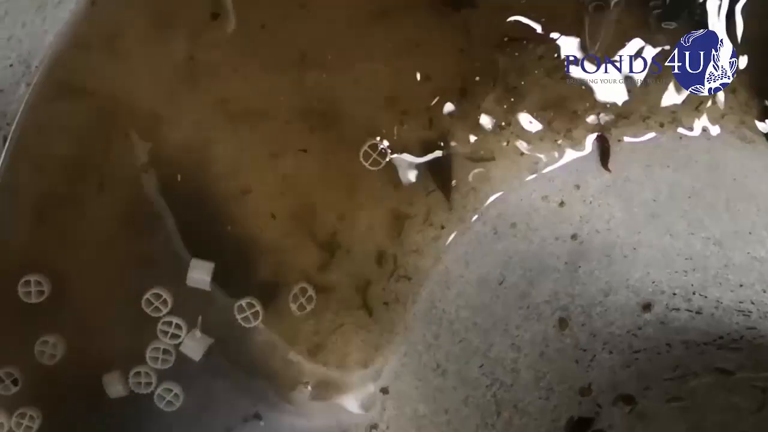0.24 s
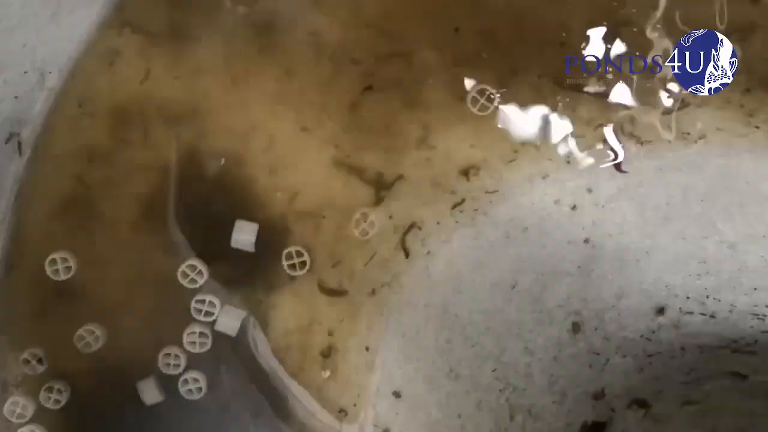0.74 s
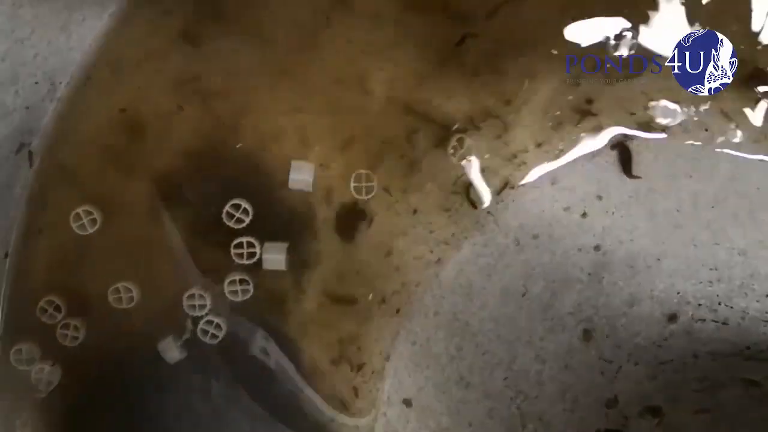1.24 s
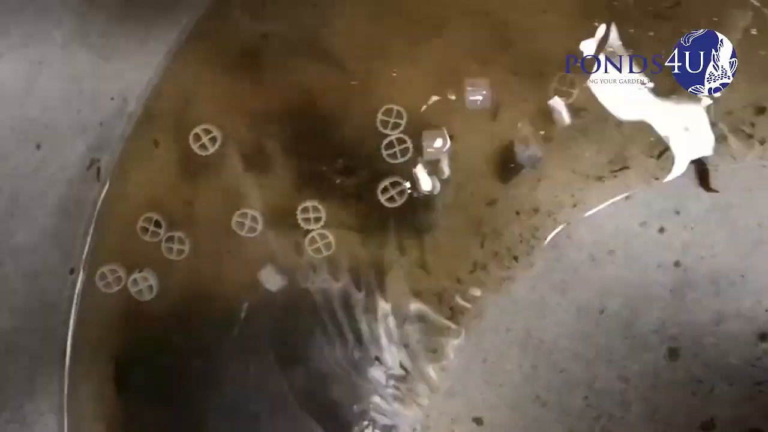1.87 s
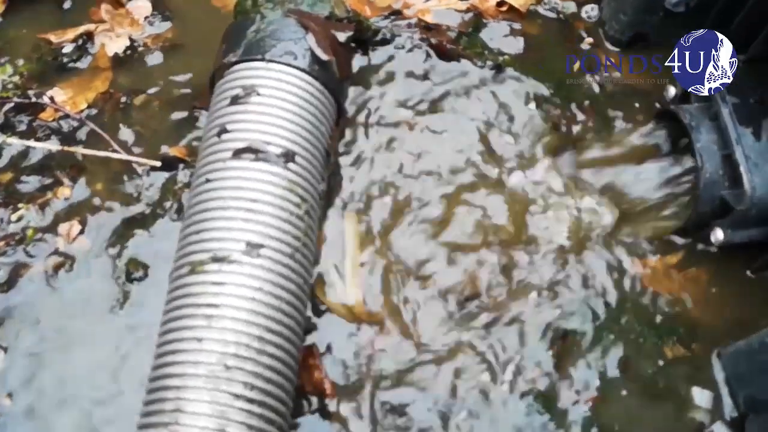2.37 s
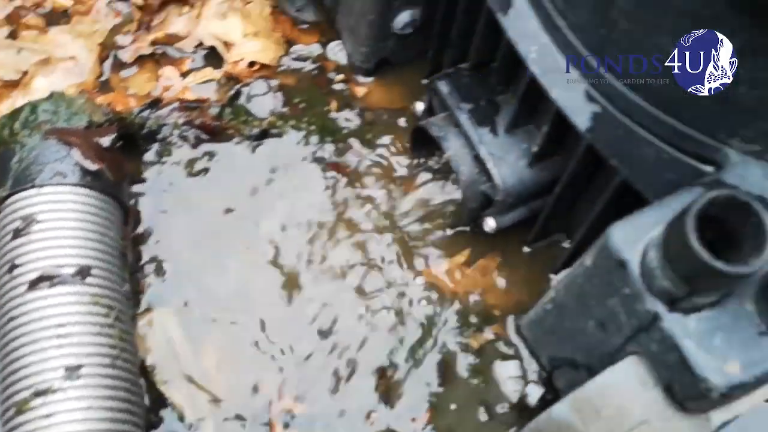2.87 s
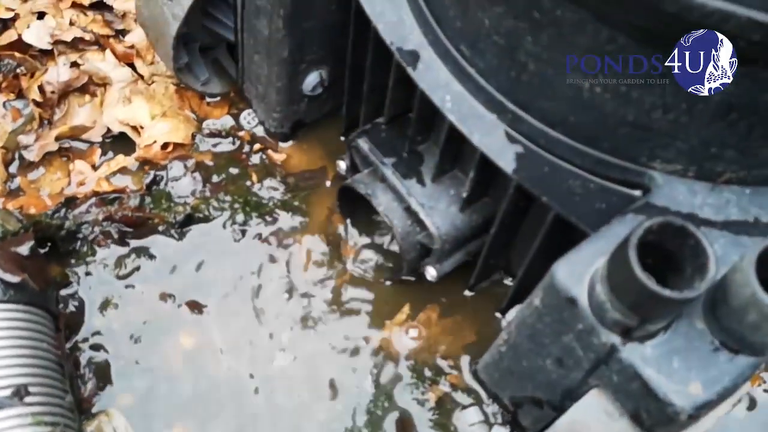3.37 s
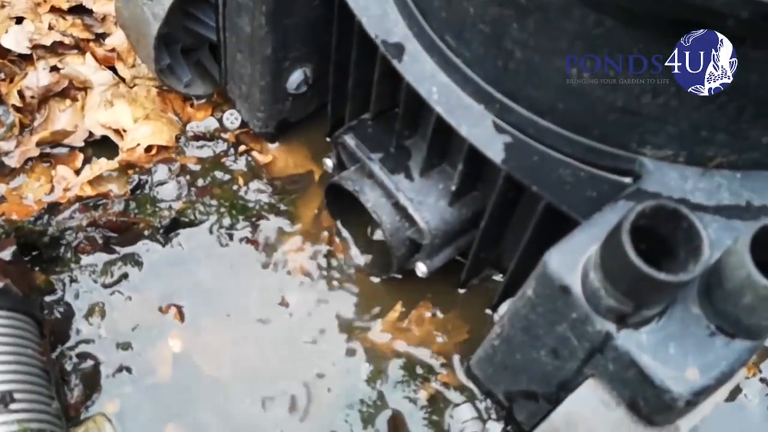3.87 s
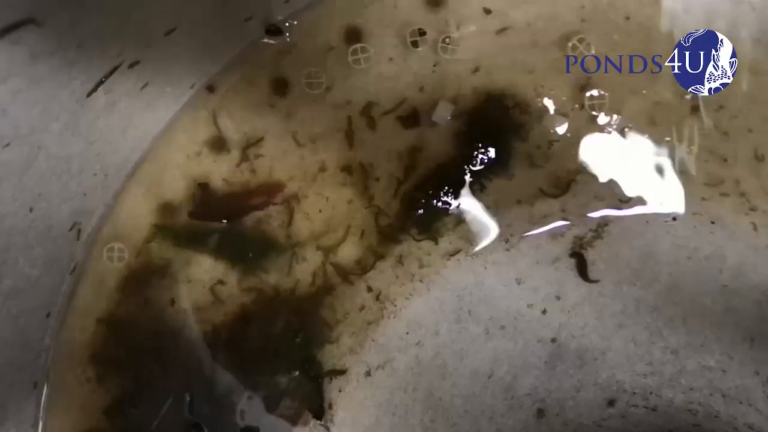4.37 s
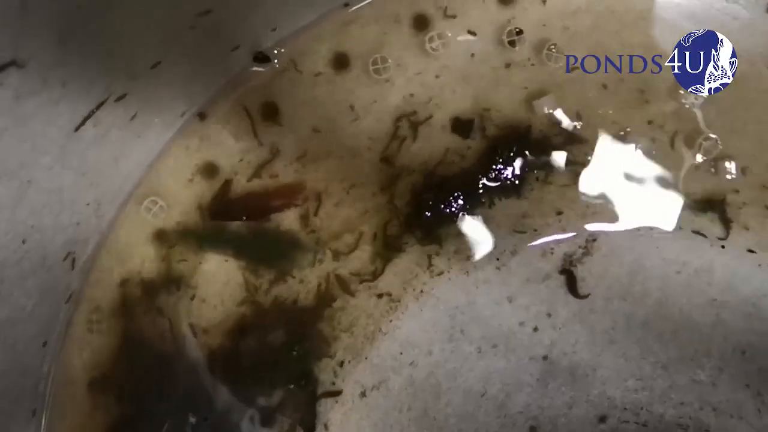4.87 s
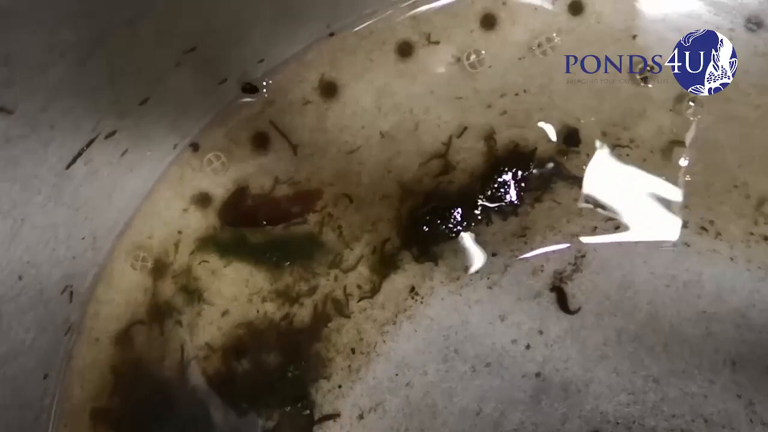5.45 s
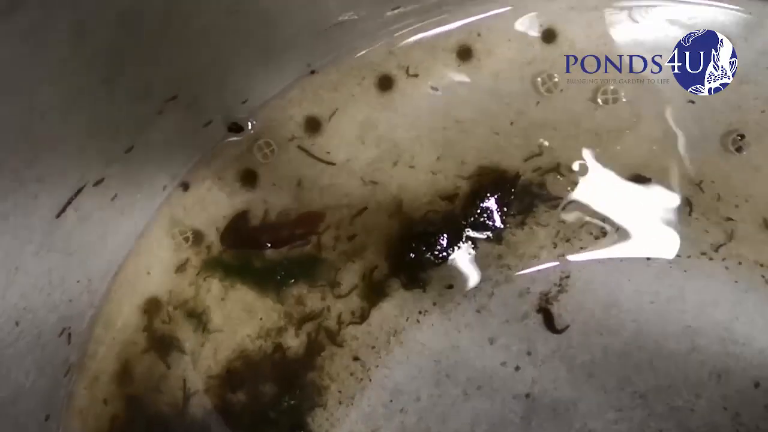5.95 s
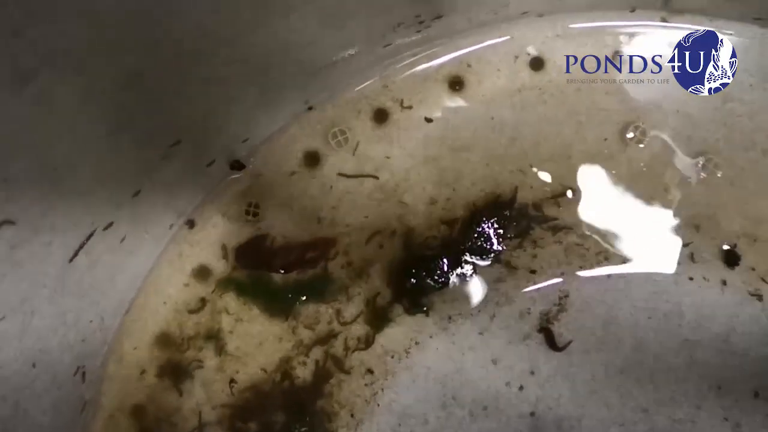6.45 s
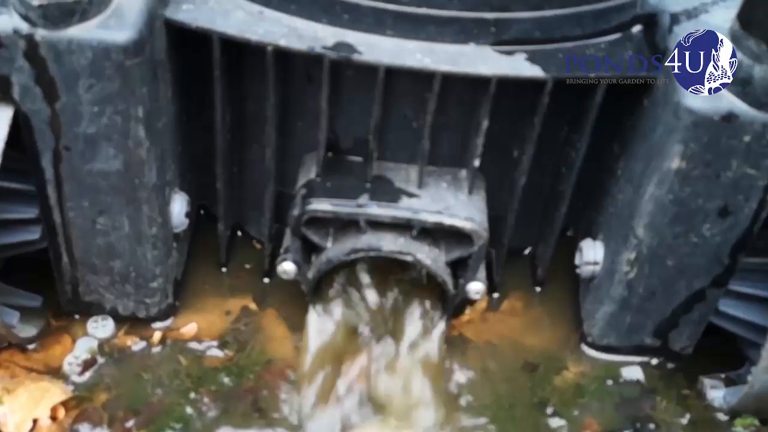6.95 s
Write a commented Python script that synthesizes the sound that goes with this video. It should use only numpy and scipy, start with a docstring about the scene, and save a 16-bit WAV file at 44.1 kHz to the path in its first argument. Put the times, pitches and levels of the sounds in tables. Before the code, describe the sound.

Water gulps, slaps and sprays inside a hollow plastic drum over a low pump hum, cutting abruptly between close, distant and gushing views.

```python
"""Water sloshes, slaps and sprays inside the plastic drum of a pond filter, heard in four hard-cut shots.
Hiss of droplets and ringing bubbles make the water; the air of the drum rings along in many modes.
The pump hums at twice the mains rate, over a drum boom and a rumble of flow.
The second shot is quieter and farther off, a short silence follows it, and the last faces the gushing outlet,
with a whine. Two microphone ports hear each shot with their own levels and phases."""
import sys
import numpy as np
from scipy import signal
from scipy.fft import rfft, irfft, next_fast_len
from scipy.io import wavfile
from scipy.ndimage import uniform_filter1d

SR = 44100
rng = np.random.default_rng(int(sys.argv[2]) if len(sys.argv) > 2 else 0)


def master_out(mix):
    """Clip the mix to full scale and print it as 16-bit PCM to the path in sys.argv[1]."""
    frames = np.transpose(np.atleast_2d(mix))
    ceiling = np.clip(frames, -1, 1)
    pcm = np.round(ceiling * 32767).astype(np.int16)
    wavfile.write(sys.argv[1], SR, pcm)


N = 317652
SLOW_STEP = 40   # samples between the points of a slow control curve


def amp(db):
    """Gain of a level in dB."""
    return 10 ** (np.asarray(db) / 20)


def rms_one(x):
    """Scaled to rms 1."""
    return x / np.sqrt(np.mean(x ** 2) + 1e-20)


# The four shots at the filter. Each row: start in seconds, end in seconds.
SHOT_TIMES = [(0, 1.505), (1.505, 3.771), (3.971, 6.903), (6.903, 7.21)]


def during(*shots):
    """1 while one of the numbered shots runs, 0 elsewhere."""
    t = np.arange(N) / SR
    return sum((t >= SHOT_TIMES[k][0]) & (t < SHOT_TIMES[k][1]) for k in shots)


def in_time(shots):
    """The columns of per-shot tables, sample by sample, jumping at the cuts."""
    t = np.arange(N) / SR
    out = np.zeros((len(shots[0][0]) - 1, N))
    for rows, (start, end) in zip(shots, SHOT_TIMES):
        s, *columns = np.transpose(rows)
        from_here = t >= start
        out[:, from_here] = [np.interp(t[from_here], s, column) for column in columns]
    return out


def at_hz(points, hz):
    """A table of frequency and value, read on a log-frequency axis."""
    table_hz, value = np.array(points).T
    return np.interp(np.log(hz), np.log(table_hz), value)


def every_sample(slow):
    """A slow control curve read at every sample."""
    return np.interp(np.arange(N) / SLOW_STEP, np.arange(len(slow)), slow)


def slow_time():
    """Times in seconds of the points of a slow control curve."""
    return np.arange(N // SLOW_STEP + 2) * SLOW_STEP / SR


def drift(rate_hz):
    """Slow random wandering of rms 1: noise through two equal one-pole low-passes."""
    r = np.exp(-2 * np.pi * rate_hz * SLOW_STEP / SR)
    settle = 2000   # points dropped while the filter settles
    noise = rng.standard_normal(N // SLOW_STEP + 2 + settle)
    slow = signal.lfilter([1], [1, -2 * r, r * r], noise)[settle:]
    return every_sample(rms_one(slow))


def grid(length=N):
    """Padded transform length and its frequencies in Hz."""
    size = next_fast_len(length + SR // 4, real=True)
    size += size % 2
    return size, np.maximum(np.arange(size // 2 + 1) * SR / size, 1)


def narrow_noise(centre_hz, width_hz):
    """Two independent noises, each twice through one resonance."""
    size, hz = grid()
    resonance = 1 / (1 + 2j * (hz - centre_hz) / width_hz) ** 2
    white = rfft(rng.standard_normal((2, N)), size)
    return rms_one(irfft(white * resonance, size)[:, :N])


def surges(start_s, hold_s, attack_s, fade_db_per_s):
    """Power of each event on the slow curve: a rise, a hold at 1, a steady fade in dB."""
    age = slow_time() - start_s[:, None]
    fading_s = np.maximum(age - attack_s - hold_s[:, None], 0)
    return np.clip(age / attack_s, 0, 1) ** 2 * amp(-2 * fade_db_per_s * fading_s)


def churn(grains_per_s, spread_db, bed_db):
    """Droplet impacts of uneven size over a bed of noise: one common draw and one for each side."""
    sizes = amp(spread_db * np.minimum(rng.exponential(1, N), 4))
    born = rng.random(N) < grains_per_s / SR
    noise = rng.standard_normal((3, N))
    grains = signal.lfilter([1], [1, -.9], sizes * born)   # each drop hisses for a fraction of a ms
    return rms_one((rms_one(grains) + amp(bed_db)) * noise)


def bubbles(per_s, low_hz, high_hz, cycles, rise, spread_db):
    """Trapped air rings a few cycles, its pitch rising as it nears the surface."""
    draws = rng.random((int(per_s * N / SR), 3))
    when, where, luck = draws[:, :1], draws[:, 1:2], draws[:, 2:]
    ticks = np.arange(SR // 40)
    turns = low_hz * (high_hz / low_hz) ** where * ticks / SR
    size_db = -spread_db * np.log(np.maximum(luck, .05))
    size = amp(size_db - 60 * turns / cycles)   # down 60 dB after the given cycles
    rings = size * np.sin(2 * np.pi * turns * (1 + rise * turns / cycles))
    at = (when * N).astype(int) + ticks
    return rms_one(np.bincount(at.ravel(), rings.ravel(), N + SR)[:N])


# Steady wash between the sloshes, a list for each shot. Each row: time in seconds,
# then the relative levels of gulp, glug, splash and spray in dB.
WASH = [
    [(0.0, -48, -37.5, -32.5, -25.5), (0.2, -30.5, -29, -28.5, -22), (0.65, -32, -27, -32.5, -25.5),
     (1.0, -29.5, -25.5, -22.5, -22), (1.33, -35, -29.5, -24, -23), (1.5, -31, -28.5, -22, -18)],
    [(1.51, -47, -45.5, -31.5, -29.5), (2.05, -46.5, -43, -38, -32), (2.5, -45.5, -46.5, -39, -32.5),
     (3.77, -46, -45.5, -38.5, -32.5)],
    [(3.98, -41, -42, -29.5, -23), (4.3, -43.5, -42.5, -27, -24.5), (4.6, -32.5, -31, -28, -29),
     (4.9, -44, -35.5, -29, -22), (5.4, -29.5, -27, -28, -27), (5.8, -31.5, -33, -34, -33),
     (6.15, -32, -33.5, -35, -36), (6.45, -32.5, -42, -28, -28.5), (6.9, -24.5, -31, -18, -18.5)],
    [(6.91, -30, -23, -22, -14.5), (7.2, -26, -25.5, -18.5, -15)],
]


def wash_power():
    """Power of the steady wash in each of the four layers."""
    return amp(2 * in_time(WASH))


# Colour of the water, a list for each shot. Each row: frequency in Hz, relative level in dB per Hz.
WATER_COLOUR = [
    [(240, -19), (400, -8.5), (559, -5.5), (641, -7), (818, -10), (1110, -6.5), (1480, -8.5), (1600, -3.5),
     (2070, -1), (2850, 3.5), (4040, -4.5), (7660, 1), (10200, -10.5), (15200, -23)],
    [(240, -23), (400, -7.5), (432, -18.5), (466, -17), (568, -31.5), (735, -10.5), (1350, -8), (1500, -10),
     (1950, -8.5), (2230, -5), (2480, -7), (3470, -10.5), (9200, -8), (10400, -19), (15200, -25.5)],
    [(240, -40), (400, -15), (671, -9.5), (1160, -3), (1230, -6.5), (1330, -1.5), (1550, -8), (1980, -1.5),
     (2450, -4.5), (3470, -6), (4230, -9.5), (7660, -4), (10700, -18.5), (15200, -27)],
    [(330, -36), (560, -20), (1070, -10), (1300, -6), (1890, -11), (2050, -4), (3280, -6), (3610, -2),
     (3930, -7), (4390, -2.5), (4700, -8), (5100, 0.5), (6920, -11), (7940, -7.5), (15200, -32.5)],
]
# Edges between gulp, glug, splash and spray: three frequencies [Hz].
LAYER_EDGES = 900, 1800, 4000


def layer_shapes(hz, shot):
    """Spectra of the four layers, which split the colour of the shot by power; silent below 300 Hz."""
    under = [1 / (1 + (hz / edge) ** 8) for edge in LAYER_EDGES]
    bands = np.diff([0 * hz, *under, 1 + 0 * hz], axis=0)   # power shares that sum to one
    colour = amp(at_hz(WATER_COLOUR[shot], hz))
    return [rms_one(band * colour * (hz > 300)) for band in np.sqrt(bands)]


# Sound common to both microphone ports. Each row: frequency in Hz, share of power 0-1.
COMMON_SHARE = [(400, 0.43), (1000, 0.51), (2000, 0.77), (4000, 0.41), (8000, 0.15), (15000, 0.5)]


def spread_hiss(hiss, hz, size):
    """Hiss at the two ports, partly common and partly each port's own."""
    shared = np.clip(at_hz(COMMON_SHARE, hz), 0, 1)
    both, *own = rfft(hiss, size)
    return np.sqrt(shared) * both + np.sqrt(1 - shared) * np.array(own)


# Air modes of the drum. Each row: centre in Hz, width in Hz, phase by which left leads in radians,
# then left and right relative level in dB for each of the four shots in turn.
DRUM_MODES = [(440, 40, -2.8, -5, 3, 10, 9, -10, 4, -10, -10), (520, 40, -2.5, -4, 2, 4, 7, -10, 3, 12, 12),
              (640, 35, 2.9, 10, -10, -1, -2, 3, 2, 6, -10), (765, 40, -2.4, 6, 2, 0, 1, 2, -1, -3, 5),
              (900, 40, 2.7, 6, 0, 0, 1, -10, 1, -2, 0), (1060, 60, -2.4, 5, 1, -10, -1, 0, 8, 1, -10),
              (1170, 50, 2.9, -1, 2, 6, 10, 1, 1, 4, -10), (1380, 80, -1.1, 1, -10, -3, 3, 9, -4, 3, 4),
              (1630, 60, -0.6, 5, 5, -10, -1, 3, -2, -6, -6), (1910, 110, -2.5, 3, 7, 6, 2, 1, 3, -10, -10),
              (2190, 50, -3.0, -8, 3, -3, -3, -10, 10, -1, -2), (2400, 90, 3.0, 3, 9, 1, -4, 1, 7, -2, -2),
              (2560, 90, 0.1, -6, 3, 9, 2, -1, 3, 7, -6), (2750, 90, 0.9, -1, 4, 7, 4, -10, 6, 0, -1),
              (3170, 90, 1.1, 3, 5, -3, 1, -2, 5, 4, 0), (3600, 120, -3.0, -3, 2, -10, 3, -10, 5, 6, 4),
              (4300, 100, -0.7, -3, -7, -10, 5, -9, -10, 9, 0),
              (5080, 200, 1.1, 1, -3, -5, -1, 4, -3, 7, 6), (5750, 250, 2.5, 9, 0, -4, -2, 2, 4, 11, -3),
              (6700, 250, 0.9, 0, -6, 4, -3, 0, -6, -1, -10), (7480, 500, 0.7, 9, -1, 5, -1, 7, -2, 4, -6),
              (7980, 130, -2.6, 10, -1, 8, 2, 6, 1, 8, 3), (9350, 300, -1.9, 0, 9, -10, 11, -9, 11, 1, 9)]


def drum_response(hz, shot, scattered_db):
    """Resonant air modes over the scattered sound in the drum, for each side."""
    summed = np.ones((2, len(hz)), complex)
    power = amp(2 * scattered_db) * np.ones((2, len(hz)))
    for centre_hz, width_hz, lead, *db in DRUM_MODES:
        level = amp(db[2 * shot:2 * shot + 2])[:, None]
        mode = level / (1 + 2j * (hz - centre_hz) / width_hz)
        summed += mode * np.exp(.5j * lead * np.array([[1], [-1]]))
        power += np.abs(mode) ** 2
    # scattered sound fills the valleys between modes, so their powers add
    out = np.sqrt(power) * np.exp(1j * np.angle(summed))
    return out / np.sqrt(uniform_filter1d(power.mean(axis=0), size=len(hz) // 24))


def wall_echoes(echo_db, t60_s):
    """A dying scatter of reflections for each side."""
    t = np.arange(SR // 5) / SR
    echoes = rng.standard_normal((2, len(t))) * amp(-60 * t / t60_s)
    return echoes * amp(echo_db) / np.sqrt(np.sum(echoes ** 2, axis=1, keepdims=True))


# Balance of the microphone. Each row: frequency in Hz, left over right in dB.
EAR_BALANCE = [(400, 0.5), (1000, 1.5), (2000, 1), (4000, 1), (8000, 2.5), (11000, -6), (15000, -7)]
# Phase between the two microphone ports, a list for each shot.
# Each row: frequency in Hz, phase by which right leads in radians.
PORT_PHASE = [
    [(400, 2.0), (560, 3.5), (640, 4), (760, 3.5), (1200, 1.5), (1600, 0.56), (2100, 4.5), (2800, 1.7),
     (3600, -2.4), (8000, 3)],
    [(400, -3.5), (1300, -2), (2000, -1), (3000, -1.5), (8000, -2.5)],
    [(400, 2), (560, 2.5), (640, 4.5), (760, 1.93), (1100, 2.5), (1900, -0.38), (2300, 3.66), (2800, -.6),
     (3600, -1.5), (6000, -0.4), (8000, 3.5)],
    [(400, -1.1), (1200, -0.19), (3000, -0.93), (6000, -1.4)],
]


def microphone_ports(hz, shot, pan_db):
    """Level and phase of the water at the left and right ports."""
    level = amp((at_hz(EAR_BALANCE, hz) + pan_db) * np.array([[.5], [-.5]]))
    return level * np.exp(.5j * at_hz(PORT_PHASE[shot], hz) * np.array([[-1], [1]]))


# Brief dips heard in the low tone, as when tone and rumble beat against each other.
# Each row: time in seconds, depth in dB.
LOW_TONE_DIPS = [(.27, 4), (.52, 11), (.76, 23), (.85, 12), (4.575, 8), (4.99, 2), (5.52, 10), (5.585, 12),
                 (5.8, 9), (5.937, 12), (6.052, 10), (6.26, 26), (6.395, 8), (6.66, 1)]
DIP_HALF_WIDTH_S = 0.017


def low_tone_dips_db():
    """Bell-shaped dips in dB, as when the low tone and the rumble beat against each other."""
    s, db = np.transpose(LOW_TONE_DIPS)
    bells = np.exp(-((slow_time() - s[:, None]) / DIP_HALF_WIDTH_S) ** 2)
    return every_sample(db @ bells)


# Partials beside the hum. Each row: multiple of its pitch, level relative to the hum in dB.
PARTIALS = [(.5, -28.5), (1.5, -31)]
HUM_HZ = 100.74


def hum(level_db):
    """Magnetic hum of the pump: a slightly wandering sine and its weak partials."""
    turn = 2 * np.pi * HUM_HZ * np.arange(N) / SR + .15 * drift(3)
    tone = np.sin(turn) + sum(amp(db) * np.sin(k * turn) for k, db in PARTIALS)
    return amp(level_db - low_tone_dips_db()) * tone


# Drum boom at rest: one relative level for each shot [dB].
BOOM_REST = -36.5, -42.5, -36, -64
# Swells of the boom. Each row: start in seconds, hold in seconds, relative level in dB.
BOOM_SWELLS = [(0, .15, -27), (.185, .04, -31), (0.286, 0.19, -25), (0.526, 0.098, -27), (0.692, 0.13, -27),
               (.885, 0.13, -20), (1.077, 0.04, -27), (1.285, 0.034, -27.5), (2.064, 0.19, -40),
               (3.965, 0.028, -18), (4.055, 0.23, -30.5), (4.35, 0.028, -35), (4.413, 0.032, -28),
               (4.566, 0.01, -30), (4.693, 0.019, -30), (4.982, 0.053, -26), (5.374, 0.063, -27.5),
               (5.563, 0.062, -24.5), (5.65, .04, -25.5), (5.727, 0.042, -24.5), (5.976, .1, -28),
               (6.275, 0.045, -23), (6.5, .13, -24.5), (6.76, .04, -29)]
SWELL_ATTACK_S, SWELL_FADE_DB_PER_S = 0.0095, 395


def boom_gain():
    """Resting level of the shot plus the swells, added as powers."""
    s, hold_s, db = np.transpose(BOOM_SWELLS)
    added = amp(2 * db) @ surges(s, hold_s, SWELL_ATTACK_S, SWELL_FADE_DB_PER_S)
    rest = sum(amp(2 * db) * during(k) for k, db in enumerate(BOOM_REST))
    return np.sqrt(rest + every_sample(added))


BOOM_HZ = 348.2


def boom():
    """The drum's lowest air mode, a sine swelling and wavering with its own phase on each side."""
    swing = 2 * np.pi * BOOM_HZ * np.arange(N) / SR + 0.61 * drift(8.0)
    left = np.sin(swing + 0.75 + 0.3 * drift(6))
    right = np.sin(swing - 1.1 + 0.3 * drift(6))
    return boom_gain() * np.array([left, right]) * amp(5.5 + .8 * drift(12))


# Colour of the rumble. Each row: frequency in Hz, relative level in dB per Hz.
RUMBLE_COLOUR = [(20, -16.5), (50, -0.5), (80, 2.5), (120, 6.5), (155, 3.5), (200, -9.5), (290, -7),
                 (420, -13.5), (600, -46)]


def rumble(level_db):
    """Rumble of the flow: coloured low noise of wavering level, independent on each side."""
    size, hz = grid()
    white = rfft(rng.standard_normal((2, N)), size)
    noise = rms_one(irfft(white * amp(at_hz(RUMBLE_COLOUR, hz)), size)[:, :N])
    return amp(level_db + 6.0 + 1.0 * drift(15)) * noise


# Slaps of water on the drum wall. Each row: start in seconds, relative level in dB, pitch in Hz,
# time to fall 60 dB in seconds, share that rings at the pitch 0-1.
WALL_SLAPS = [(0.159, -12, 1700, 0.065, 0.4), (0.245, -7, 800, 0.04, 0.3), (0.429, -3, 1780, 0.13, 0.64),
              (0.463, -1.5, 1780, 0.065, 0.54), (0.52, -10, 1680, 0.12, 0.4), (0.595, -5, 1500, 0.03, 0.1),
              (0.846, -6, 2900, 0.085, 0.2), (0.85, -4, 520, 0.12, 0.3), (1.031, -5, 2780, 0.056, 0.34),
              (1.112, -8, 1580, 0.07, 0.6), (1.236, -13, 2780, 0.07, 0.2), (1.347, -9, 2320, 0.07, 0.4),
              (2.228, -19.5, 2040, 0.088, 0.3), (4.12, -8.5, 4300, 0.09, 0.07), (4.33, -3, 2500, 0.13, 0.1),
              (4.48, 1.5, 2300, 0.052, 0.1), (4.642, 2, 2030, 0.07, 0.67), (4.706, -3, 2530, 0.049, 0.4),
              (4.779, -1, 3080, 0.078, 0.3), (4.779, -8, 1370, 0.07, 0.84), (4.819, -21, 2740, 0.07, 0.4),
              (5.002, -4, 1327, 0.17, 0.4), (5.059, -4, 2260, 0.089, 0.7), (5.158, -3.5, 2495, 0.099, 0.27),
              (5.209, -5.5, 1340, 0.091, 0.8), (5.315, -1, 1180, 0.044, 0.2),
              (5.459, -4.5, 1910, 0.049, 0.5), (5.609, -6, 1050, 0.054, 0.54), (5.645, -6, 1190, 0.05, 0.5),
              (5.677, -6.5, 3010, 0.05, 0.4), (5.764, -1.5, 1010, 0.034, 0.8),
              (5.842, -6, 2640, 0.076, 0.43), (5.93, -12, 1367, 0.076, 0.8), (6.001, -19, 1720, 0.31, 0.8),
              (6.161, -8.5, 2690, 0.05, 0.3), (6.295, -12, 1010, 0.045, 0.5),
              (6.314, -7.5, 1960, 0.12, 0.46), (6.443, -25, 2630, 0.07, 0.8),
              (6.508, -4, 1880, 0.047, 0.53), (6.612, -8, 1135, 0.08, 0.45), (6.693, -6, 2700, 0.06, 0.2)]


def slaps():
    """Each slap is a bright crack, a dying noise burst and a plop ringing at its own rising pitch."""
    out = np.zeros(N + SR)
    t = np.arange(SR // 8) / SR
    noise = rng.standard_normal((len(WALL_SLAPS), len(t)))
    bright = signal.butter(2, [900, 9000], "band", fs=SR, output="sos")
    for (s, db, centre_hz, t60_s, share), burst in zip(WALL_SLAPS, noise):
        around = signal.butter(1, [centre_hz / 1.4, centre_hz * 1.4], "band", fs=SR, output="sos")
        crack = 0.14 * signal.sosfilt(bright, burst) * amp(-60 * t / 0.0071)
        plop = 2.0 * np.sin(2 * np.pi * centre_hz * t * (1 + 1.1 * t))
        share = np.clip(share, 0, 1)
        body = (1 - share) * rms_one(signal.sosfilt(around, burst)) + share * plop + crack
        out[round(s * SR):][:len(t)] += amp(db - 12.0 - 60 * t / max(t60_s, .01)) * body
    return out[:N]


# Sloshes in the drum. Each row: start in seconds, hold in seconds, relative level in dB,
# centre in octaves above 600 Hz.
DRUM_SLOSHES = [(0.166, 0.025, -25.5, 1.16), (0.288, .03, -22.5, 0.66), (0.448, .03, -20, 0.38),
                (0.513, 0.011, -18, 1), (0.564, 0.0078, -19, 0.69), (0.688, 0.056, -25, 1.1),
                (0.67, 0.13, -20.5, 2.76), (0.824, 0.019, -19, 0.086), (0.826, 0.027, -20.5, 2.2),
                (1.096, 0.041, -20.5, 1.5), (1.134, 0.021, -14, 3.23), (1.22, .03, -16.5, 2.8),
                (1.265, 0.017, -12, 2.9), (1.356, .03, -17, 1.47), (1.366, 0.077, -16, 3.25),
                (4.33, 0.091, -16, 1.54), (4.434, 0.051, -14, 1.55), (4.624, 0.018, -20.5, 1.22),
                (4.69, 0.008, -23, 1.4), (4.772, 0.0062, -17.5, 2.4), (4.948, 0.041, -21, 2.2),
                (4.997, 0.12, -16, 1.85), (5.175, 0.071, -12.5, 1.76), (5.39, 0.11, -23.5, 1.5),
                (5.48, 0.13, -23, 0.17), (5.647, .05, -25, 2.32), (5.724, 0.025, -23, 0.91),
                (5.81, 0.0092, -31, 0.12), (5.835, 0.016, -22, 1.8), (5.911, 0.017, -21.5, 1.6),
                (6.004, 0.024, -23, 1.4), (6.026, 0.037, -24, 2.6), (6.157, 0.024, -27, 2.2),
                (6.09, 0.037, -32.5, 0.26), (6.156, 0.026, -36, 0.1), (6.273, .04, -23.5, 0.31),
                (6.346, 0.12, -20.5, 2.54), (6.42, 0.027, -19, 2.16), (6.496, .04, -24.5, 0.99),
                (6.607, 0.039, -18, 1.1), (6.677, .1, -14, 1.8), (6.78, 0.12, -17, 2)]
# Places of gulp, glug, splash and spray [octaves above 600 Hz].
LAYER_PLACES = 0, 1.1, 2.2, 3.3
SLOSH_ATTACK_S, SLOSH_FADE_DB_PER_S = 0.0059, 247
DARKER_DB_PER_OCTAVE, BRIGHTER_DB_PER_OCTAVE = 11, 7   # fall-off below and above the centre


def slosh_power():
    """Power that the sloshes bring to each layer, most in the layer nearest their centre."""
    s, hold_s, db, centre = np.transpose(DRUM_SLOSHES)
    above = np.array(LAYER_PLACES)[:, None] - centre
    db = db - np.where(above > 0, BRIGHTER_DB_PER_OCTAVE, -DARKER_DB_PER_OCTAVE) * above
    added = amp(2 * db) @ surges(s, hold_s, SLOSH_ATTACK_S, SLOSH_FADE_DB_PER_S)
    return np.array([every_sample(row) for row in added])


# A ring that fades after the first cut. Each row: time in seconds, relative level in dB.
RING_FADE = [(1.505, -35), (1.95, -38), (2.2, -45), (2.6, -60)]


def fading_ring():
    """A resonant band of noise that dies away in the far shot."""
    s, db = np.transpose(RING_FADE)
    level_db = np.interp(np.arange(N) / SR, s, db, right=-90)
    return during(1) * amp(level_db) * narrow_noise(2540, 280)


def thrum():
    """Soft low band of noise in the far shot, the same on both sides."""
    return amp(-39.5) * during(1) * narrow_noise(290.4, 35)[0]


# Character of each shot. Each row: flicker in dB before the layer's share, bubbles against the hiss in dB,
# left over right in dB.
SHOT_MOOD = [(1.17, -4, -0.8), (1, -7, -3.2), (1.82, -2.5, -3), (0.1, -22, 0)]
# Multipliers of the flicker for gulp, glug, splash and spray [ratio].
LAYER_FLICKER = 1.5, 0.91, 0.65, 0.87
SLAP_RING_DB = -4.5   # part of a slap that sets the drum's air ringing


def water():
    """Gulp, glug, splash and spray share the drum and the colour of each shot, each on its own level."""
    hiss = churn(400, 3.4, 1.3), churn(900, 6.0, 2.0), churn(2500, 3.8, 2.0), churn(5000, 4.4, 8.1)
    rings = (bubbles(60, 450, 1060, 19, 0.12, 0.75), bubbles(140, 913, 1780, 26, .15, 2.1),
             bubbles(260, 1800, 3600, 34, 0.31, 3.9), np.zeros(N))   # the spray holds no bubbles
    flicker = [drift(25.4) + drift(18) for layer in hiss]
    gains = np.sqrt(wash_power() + slosh_power())
    hits, echoes = slaps(), wall_echoes(-11, .16)
    out = np.zeros((2, N))
    for shot, ((start, end), (flicker_db, bubble_db, pan_db)) in enumerate(zip(SHOT_TIMES, SHOT_MOOD)):
        now = slice(round(start * SR), min(round(end * SR), N))
        length = now.stop - now.start
        size, hz = grid(length)
        total = 0
        for k, shape in enumerate(layer_shapes(hz, shot)):
            gain = gains[k, now] * amp(LAYER_FLICKER[k] * flicker_db * flicker[k][now])
            total = total + shape * spread_hiss(hiss[k][:, now] * gain, hz, size)
            ringing = rfft(rings[k][now] * gain * amp(bubble_db), size)
            total = total + shape / shape.max() * ringing
        hit = rfft(hits[now], size)
        in_drum = drum_response(hz, shot, 2.5) * (total + amp(SLAP_RING_DB) * hit)
        heard = (in_drum + hit) * microphone_ports(hz, shot, pan_db)   # slaps also arrive directly
        out[:, now] = irfft(heard * (1 + rfft(echoes, size)), size)[:, :length]
    return np.sqrt(2) * (out + fading_ring())


def whine():
    """A steady sine at the outlet in the last shot, the right side leading by 1 radian."""
    turn = 2 * np.pi * 500 * np.arange(N) / SR
    return amp(-21.5) * during(3) * np.sin(turn + np.array([[-.5], [.5]]))


# Pump, a list for each shot. Each row: time in seconds, relative hum level in dB,
# relative rumble level in dB.
PUMP_LEVELS = [
    [(0.0, -9.5, -20), (0.4, -9, -25), (0.52, -8, -16.5), (0.66, -8.5, -19.5), (0.92, -9, -24),
     (1.13, -14, -25), (1.22, -20, -35), (1.33, -16.5, -26), (1.5, -16.5, -33)],
    [(1.51, -23, -39), (1.9, -22.5, -38.5), (2.65, -20.5, -35), (3.77, -21.5, -37.5)],
    [(3.98, -10, -21), (4.3, -8.5, -24.5), (4.34, -14.5, -27.5), (4.5, -18, -29.5), (4.65, -15, -28.5),
     (4.94, -13, -26), (5.13, -13, -24), (5.18, -15, -29.5), (5.45, -14, -25), (5.63, -5, -16.5),
     (5.76, -10, -19), (5.86, -4.5, -21), (6.03, -6.5, -17), (6.2, -5, -16.5), (6.32, -5.5, -18),
     (6.46, -11.5, -27.5), (6.6, -9.5, -23), (6.66, -25, -20.5), (6.78, -18, -30), (6.9, -28, -27)],
    [(6.91, -44, -32.5), (7.2, -63, -30.5)],
]


def pump():
    """Hum, drum boom and rumble of the flow, with the thrum of the far shot and the outlet whine."""
    hum_db, rumble_db = in_time(PUMP_LEVELS)
    tones = hum(hum_db) + boom() + whine()
    return np.sqrt(2) * tones + rumble(rumble_db) + thrum()


def scene():
    """Water over the pump."""
    return water() + pump()


def record(dry):
    """Bass is folded to the centre, the cuts are hard, peaks clip at full scale, the top is cut."""
    mid, side = (dry[0] + dry[1]) / 2, (dry[0] - dry[1]) / 2
    mono_below = signal.butter(5, 265, "high", fs=SR, output="sos")   # Hz
    side = signal.sosfiltfilt(mono_below, side)
    cut = np.clip(np.array([mid + side, mid - side]) * during(0, 1, 2, 3), -1, 1)
    top = signal.ellip(12, .3, 60, 15200, fs=SR, output="sos")   # cutoff in Hz
    return np.clip(signal.sosfilt(top, cut), -1, 1)


dry = scene()
out = record(dry)
master_out(out)
```